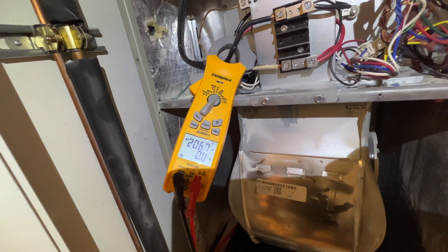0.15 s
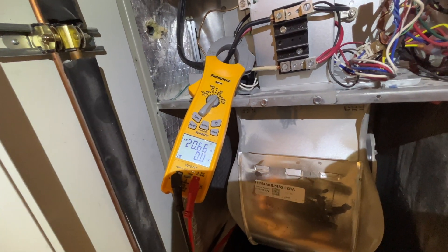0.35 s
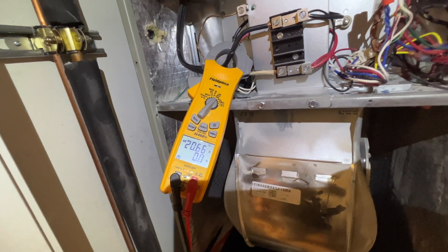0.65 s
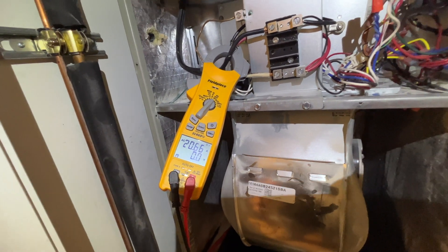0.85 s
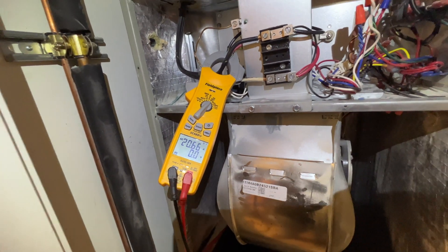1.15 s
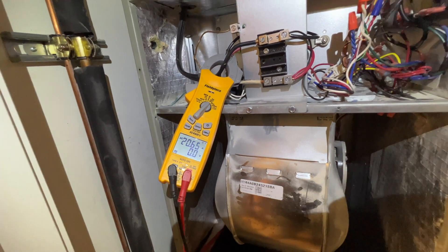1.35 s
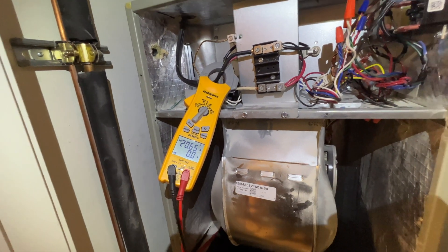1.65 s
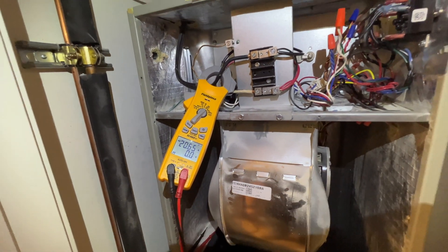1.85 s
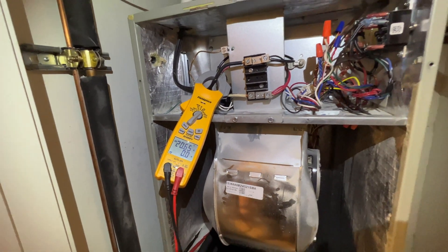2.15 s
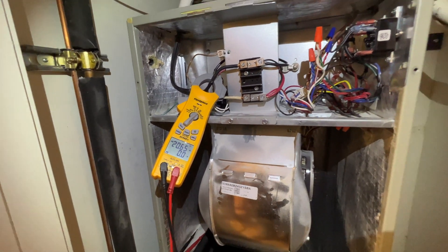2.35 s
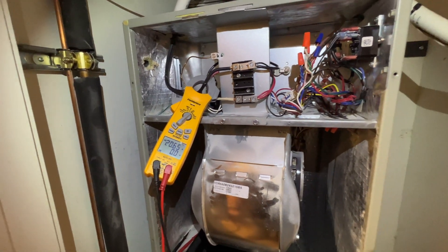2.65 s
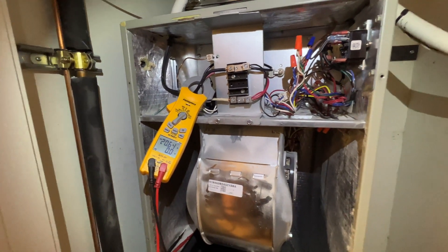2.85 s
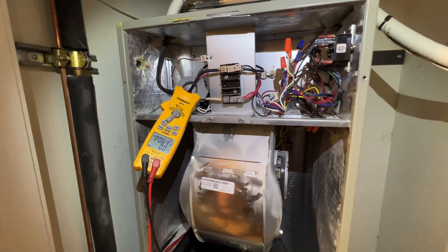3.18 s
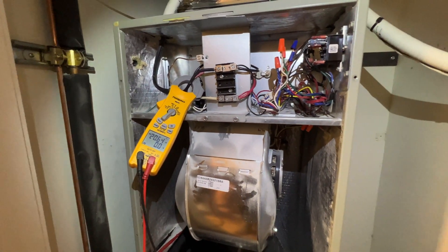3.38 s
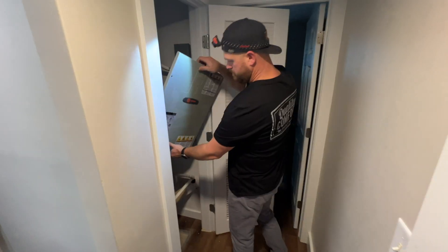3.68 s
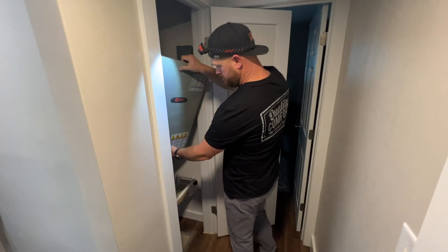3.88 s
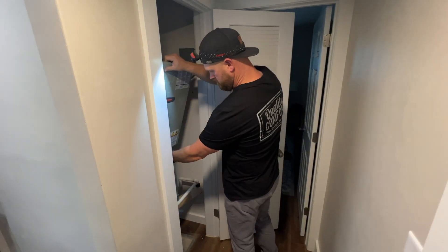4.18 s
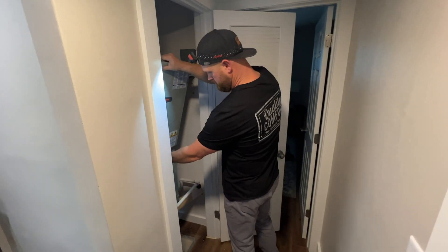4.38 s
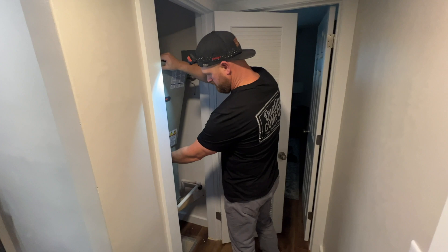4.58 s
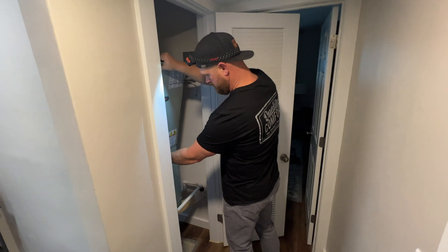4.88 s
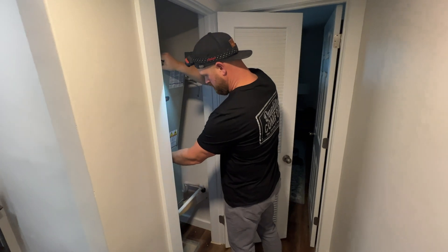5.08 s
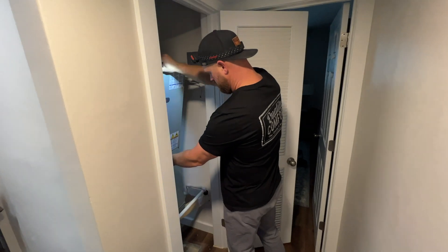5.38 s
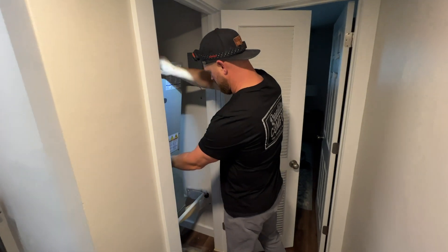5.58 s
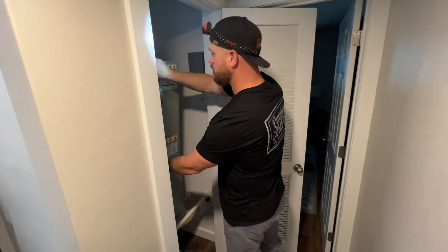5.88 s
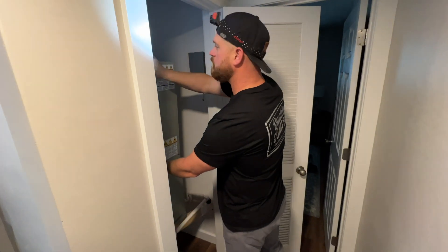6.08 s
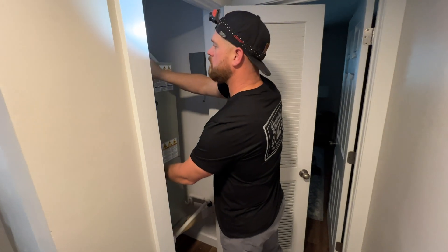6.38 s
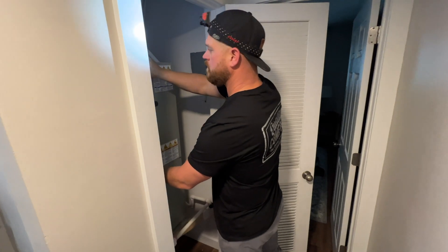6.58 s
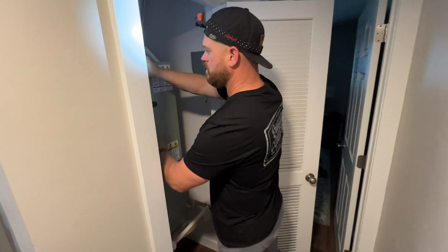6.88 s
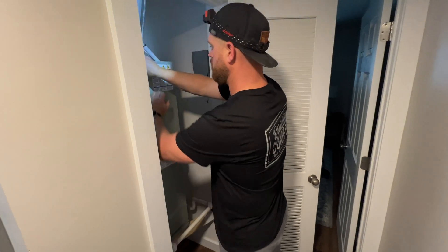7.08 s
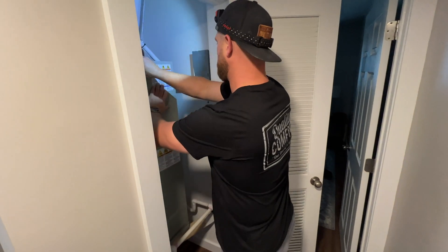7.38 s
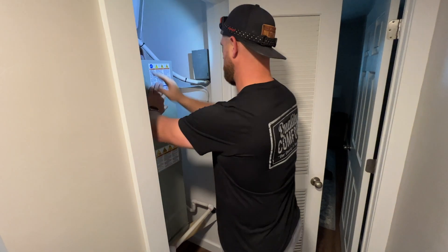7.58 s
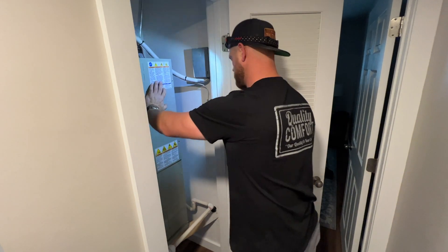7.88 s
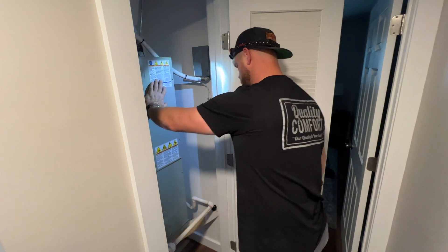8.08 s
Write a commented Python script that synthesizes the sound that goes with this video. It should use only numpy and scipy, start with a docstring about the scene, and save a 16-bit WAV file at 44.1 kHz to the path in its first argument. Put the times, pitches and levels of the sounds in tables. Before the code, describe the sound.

A blower rushes loudly through an open metal cabinet, then, abruptly quieter from a hallway, a sheet-metal panel bangs and scrapes shut over a low hum.

```python
"""At an air handler's open cabinet, close by, turbulent noise rushes through ringing sheet metal over a low rumble.
From 0.6 s the listener backs away, and the rush's echo off the closet wall colours it upward.
At 3.5 s the place jumps to the hallway: the access panel is knocked, slid and pushed into place, heard as
decaying modes, gritty noise and short cracks. Its closing muffles the rush and leaves the motor's hum and
faint whine, with thin whistles of air at the last slit; near the end the blower slowly grows."""
import sys
import numpy as np
from scipy import signal
from scipy.fft import rfft, irfft
from scipy.io import wavfile

SR = 44100
rng = np.random.default_rng(int(sys.argv[2]) if len(sys.argv) > 2 else 0)


def digitize_waveform(pressure):
    """Quantize a signal to 16-bit integers and store it at the path in sys.argv[1].

    Rows of a 2-D input are taken as channels; values are limited to [-1, 1].
    """
    field = np.atleast_2d(pressure).T
    bounded = np.clip(field, -1, 1)
    quanta = np.round(bounded * 32767).astype(np.int16)
    wavfile.write(sys.argv[1], SR, quanta)


N = 363825
TIME = np.arange(N) / SR   # s
FREQS = np.maximum(np.fft.rfftfreq(N, 1 / SR), 1)   # Hz
LEFT_RIGHT = np.array([[1], [-1]])
MOVE_S = 3.494   # the listening point jumps from the cabinet to the hallway

# the sound field in the hallway: (frequency [Hz], left-right likeness [-1 to 1], left minus right [dB])
HALLWAY_FIELD = [(60, 1, 1), (120, 1, 3), (202, 0.68, -3), (380, 0.87, -1), (466, 0, 1.5), (670, 0.13, 5),
                 (1300, 0.057, 2), (2380, 0.065, 1), (4660, 0, 7), (8300, 0, 10), (11700, 0.36, 0)]


def from_db(db):
    """Decibels to gain."""
    return 10 ** (np.asarray(db) / 20)


def rms(x):
    """Root mean square."""
    return np.sqrt(np.mean(x ** 2) + 1e-20)


def in_time(rows):
    """Each column of a curve at every sample."""
    s, *columns = np.transpose(rows)
    return [np.interp(TIME, s, c) for c in columns]


def in_frequency(rows):
    """Each column of a spectrum at every frequency."""
    hz, *columns = np.transpose(rows)
    return [np.interp(np.log(FREQS), np.log(hz), c) for c in columns]


def ease(start, length):
    """A smooth move from 0 to 1."""
    return (1 - np.cos(np.pi * np.clip((TIME - start) / length, 0, 1))) / 2


def drift(rate_hz):
    """Random wander of rms 1, weak above the given rate."""
    slow = irfft(rfft(rng.standard_normal(N)) / (1 + (FREQS / rate_hz) ** 2), N)
    return slow / rms(slow)


def dying(t, t60):
    """A decay by 60 dB in t60 seconds that starts at t = 0."""
    return from_db(-60 * np.clip(t / t60, 0, 4)) * (t >= 0)


def low_pass(x, hz):
    """Three-pole low-pass."""
    return signal.sosfilt(signal.butter(3, min(hz, .45 * SR), fs=SR, output="sos"), x)


def add(out, s, sound):
    """Mix a stereo sound in at a given time."""
    at = int(s * SR)
    out[:, at:at + sound.shape[1]] += sound[:, :N - at]


def standing_waves():
    """Early echoes ripple the spectrum (dB), differently at each ear and most in the middle range."""
    depth_db, echo_spread_s, fade_above_hz = 6, 0.0098, 2270
    # smoothing along frequency sets how closely the ripples are spaced
    r = np.exp(-2 * np.pi * echo_spread_s * SR / N)
    ripple = signal.lfilter([1], [1, -2 * r, r * r], rng.standard_normal((2, len(FREQS))))
    return depth_db * ripple / rms(ripple) / (1 + 600 / FREQS + FREQS / fade_above_hz)


def air(spectrum, stereo, lift_db=0):
    """Stereo noise of rms 1 with a given colour; a table sets how alike the two ears are at each pitch."""
    alike, balance_db = in_frequency(stereo)
    alike = np.clip(alike, -1, 1)
    mid, side = rfft(rng.standard_normal((2, N)))
    pair = np.sqrt(1 + alike) * mid + np.sqrt(1 - alike) * side * LEFT_RIGHT
    colour_db = in_frequency(spectrum)[0] + lift_db + LEFT_RIGHT * balance_db / 2
    noise = irfft(pair * from_db(colour_db + standing_waves()) * (FREQS > 15), N)
    return noise / rms(noise)


def open_blower(flutter_db=.5):
    """Turbulence from the wheel rings in the cabinet; stepping back changes which resonances stand out."""
    # air at the open cabinet: (frequency [Hz], relative level per Hz [dB])
    rush_colour = [(25, -35), (40, -12), (62, -4.5), (110, -1), (165, -9), (260, -15), (420, -10.5),
                   (600, -19), (740, -17.5), (1000, -18.5), (2000, -21.5), (3300, -27), (7000, -32.5),
                   (9000, -34.5), (10500, -47.5), (15000, -52)]
    # cabinet resonances: (frequency [Hz], width [Hz], lift close by [dB], lift a step back [dB])
    cabinet_modes = [(113, 76, 1.5, 0), (180, 26, 0.5, -1.5), (210.6, 31.6, 9, 10), (319, 47, 7.5, 2.5),
                     (475, 58, 1, 7), (646, 103, 5, -0.5), (824, 87, 5.5, 2.5), (866, 35, 4, 5),
                     (1030, 96, 0.5, 2.5), (1230, 140, 0.5, 1), (1607, 21, 7.5, 2), (1730, 21, -13, 5)]
    # the sound field at the cabinet: (frequency [Hz], left-right likeness [-1 to 1], left minus right [dB])
    near_field = [(60, 0.99, -0.5), (199, 0.98, 2.5), (382, 0.89, 3.5), (610, 0.43, -1), (800, 0.97, 3.5),
                  (1300, 0.26, 3), (2360, 0, -1.5), (3520, 0, 0), (4730, 0.22, 6), (7600, 0, 0)]
    back_start_s, back_takes_s = 0.61, 1.84
    close_level_db, back_loss_db = -29, 1.21

    back = ease(back_start_s, back_takes_s)
    hz, width, close_db, back_db = np.transpose(cabinet_modes)
    bells = 1 / (1 + (2 * (FREQS[:, None] - hz) / width) ** 2)
    # equal-power crossfade between the two distances
    rush = np.sqrt(1 - back) * air(rush_colour, near_field, bells @ close_db)
    rush += np.sqrt(back) * air(rush_colour, near_field, bells @ back_db)
    return rush * from_db(close_level_db - back_loss_db * back + flutter_db * drift(21))


def wall_echo(rush):
    """The closet wall returns the rush a moment later; the lag shrinks with distance, so the colour sweeps upward."""
    # lag of the echo off the closet wall: (time [s], left [ms], right [ms])
    wall_lag = [(0, 1.42, 1.15), (0.8, 1.38, 1.15), (1.7, 1.17, 0.9), (2.8, 0.98, 0.8), (3.5, 0.85, 0.75)]
    echo_db, echo_top_hz = -11.5, 4370
    dull = signal.sosfilt(signal.butter(1, echo_top_hz, fs=SR, output="sos"), rush)
    echo = [np.interp(TIME - lag_ms / 1000, TIME, ear) for lag_ms, ear in zip(in_time(wall_lag), dull)]
    return rush + from_db(echo_db) * np.array(echo)


def hallway_blower(waver_db=-1.5, hum_wander=0.91):
    """The escaping air fades as the gap narrows; hum and rumble step up when the panel seats; all grow on approach."""
    # rumble and air that reach the hallway through the cabinet walls: (frequency [Hz], relative level per Hz [dB])
    through_walls = [(25, -38), (45, -6.5), (70, 3), (125, 3.5), (170, -21), (205, -13), (255, -22.5),
                     (360, -16.5), (450, -36), (510, -25.5), (580, -27.5), (740, -25.5), (850, -27.5),
                     (940, -30), (4000, -45), (9500, -45.5), (15000, -53)]
    # air that escapes past the panel: (frequency [Hz], relative level per Hz [dB])
    past_panel = [(100, 10), (300, 5.5), (500, 4.5), (620, -4), (730, -5.5), (820, 4), (920, -5),
                  (1050, -2.5), (1400, -7), (2000, -5), (3500, -14.5), (8500, -23), (11000, -45),
                  (15000, -46)]
    # the gap beside the panel narrows steadily until it is as good as shut
    shut_s, leak_db, leak_fall_db_per_s = 6.54, -41.5, 3.5
    # the panel seats on its frame and from then on radiates the motor's hum and rumble
    seat_s, seat_takes_s = 4.6, 0.66
    hum_hz, hum_db, seated_hum_db = 117.8, -49, 9   # level before seating, gain once seated
    rumble_db, seated_rumble_db = -36, 1.03
    # the listener then edges toward the closet; the hum grows faster than the air
    approach_start_s, air_db_per_s, hum_db_per_s = 6.8, 1.4, 3.2

    closing_s = np.clip(TIME, MOVE_S, shut_s) - MOVE_S
    seated = ease(seat_s, seat_takes_s)
    approach_s = np.maximum(TIME - approach_start_s, 0)
    leak = from_db(leak_db - leak_fall_db_per_s * closing_s) * air(past_panel, HALLWAY_FIELD)
    rumble = from_db(rumble_db + seated_rumble_db * seated) * air(through_walls, HALLWAY_FIELD)
    hum = np.sqrt(2) * np.sin(2 * np.pi * hum_hz * TIME + hum_wander * drift(6.6))
    hum_level_db = hum_db + seated_hum_db * seated + hum_db_per_s * approach_s
    hum *= from_db(hum_level_db + waver_db * drift(3.3))
    return from_db(air_db_per_s * approach_s) * (leak + rumble) + hum


def motor_whine():
    """Thin tones of the motor come and go, creeping upward in pitch, a little stronger on the left."""
    # whine tones: (start [s], end [s], first pitch [Hz], last pitch [Hz], level before left-right lean [dB])
    whine_tones = [(4.6, 6.0, 808, 818, -65), (6.45, 7.85, 665, 682, -62), (7.25, 8.5, 871, 877, -60.5)]
    fade_s, lean_db, wander_rad = .2, 2.0, .3
    out = 0
    for start, end, first_hz, last_hz, db in whine_tones:
        pitch = np.interp(TIME, [start, end], [first_hz, last_hz])
        phase = 2 * np.pi * np.cumsum(pitch) / SR
        gate = np.clip(np.minimum(TIME - start, end - TIME) / fade_s, 0, 1)
        out = out + np.sqrt(2) * gate * from_db(db) * np.sin(phase + wander_rad * drift(1.4))
    return out * from_db(lean_db * LEFT_RIGHT)


def slit_whistles():
    """Air whistles thinly and unsteadily through the last slit; each pitch rises and falls with its loudness."""
    # whistles: (start [s], length [s], base pitch [Hz], rise [Hz], level at full swell before flicker [dB])
    whistle_tones = [(5.75, 1.7, 7050, 100, -76), (5.65, 1.8, 8050, 70, -74), (6.9, 0.22, 9700, 500, -72),
                     (7.16, 0.2, 9700, 350, -71)]
    wander, blur, flicker_db = .005, .007, 3   # slow and fast pitch spread as fractions
    out = 0
    for start, length, hz, rise_hz, db in whistle_tones:
        swell = np.sin(np.pi * np.clip((TIME - start) / length, 0, 1))
        pitch = (hz + rise_hz * swell ** 2) * (1 + wander * drift(9) + blur * drift(250))
        level = from_db(db + flicker_db * drift(8.8)) * np.sqrt(np.abs(swell))
        out = out + np.sqrt(2) * level * np.sin(2 * np.pi * np.cumsum(pitch) / SR)
    return out


def panel_scrapes(grit_db=2.5, room_t60=0.19):
    """Short gritty slides of metal on metal: each swells as the edge bites, then dies away in the hallway."""
    # the panel's edge slides on the frame: (time [s], level before low-pass [dB], length [s], cut-off [Hz])
    edge_slides = [(3.704, -52, 0.044, 9000), (3.858, -41.5, 0.031, 14000), (4.058, -43.5, 0.0079, 14000),
                   (4.533, -51, .022, 6000), (4.852, -46, 0.054, 8000), (4.896, -40.5, 0.025, 14000),
                   (5.173, -54.5, 0.033, 14000), (5.427, -51, 0.041, 4000), (5.858, -45.5, 0.022, 2400),
                   (6.584, -47.5, 0.017, 9000), (6.702, -48, 0.01, 2400), (6.81, -53, 0.0093, 3500),
                   (7.425, -48, 0.022, 12000), (7.473, -49, .02, 2400), (8.16, -55, .06, 14000)]
    # colour of the sliding edge: (frequency [Hz], relative level per Hz [dB])
    edge_colour = [(100, -14), (330, 8), (800, 10), (1500, 14), (3000, 8), (4300, 5.5), (5700, 4.5),
                   (9000, 0), (11000, -11), (15000, -5)]
    friction = from_db(grit_db * drift(230)) * air(edge_colour, HALLWAY_FIELD)
    out = 0
    for s, db, length, top_hz in edge_slides:
        swell = np.clip((TIME - s) / (length / 3), 0, 1)
        stroke = swell * dying(np.maximum(TIME - s - length, 0), room_t60)
        out = out + from_db(db) * stroke * low_pass(friction, top_hz)
    return out


def lip_snaps(crack_t60=0.013, room_db=-11, room_t60=0.27):
    """The panel's lip snaps on the metal frame: a crisp crack of narrow noise with a short hallway echo."""
    # snaps: (time [s], level before left-right lean and decay [dB], pitch [Hz])
    snaps = [(4.058, -39, 1850), (4.485, -45, 2600), (4.899, -37, 6200), (4.907, -39, 6100),
             (4.913, -42, 7200), (4.921, -41, 5950), (4.934, -47, 5800), (4.962, -50, 6100),
             (5.453, -50, 4530), (6.596, -50, 3600), (6.708, -48, 1790), (7.288, -54, 4800),
             (7.423, -44, 3140), (7.427, -52, 8000)]
    spread = 1.25   # a snap's band reaches this factor either side of its pitch
    out, t = np.zeros((2, N)), TIME[:SR // 2]
    fade = dying(t, crack_t60) + from_db(room_db) * dying(t, room_t60)
    balance_db = in_frequency(HALLWAY_FIELD)[1]
    for s, db, hz in snaps:
        edges_hz = [hz / spread, min(hz * spread, .45 * SR)]
        band = signal.butter(2, edges_hz, "band", fs=SR, output="sos")
        crack = signal.sosfilt(band, rng.standard_normal((2, len(t))))
        lean_db = balance_db[np.searchsorted(FREQS, hz)] * LEFT_RIGHT / 2
        add(out, s, from_db(db + lean_db) * fade * crack / rms(crack))
    return out


def panel_modes(swell_cycles=0.96):
    """One second of the panel's ring; low modes swell last, high ones reach the two ears out of step."""
    # panel modes: (frequency [Hz], relative level [dB], decay t60 [s])
    sheet_modes = [(77, 1, 0.21), (105.7, -5, 0.31), (125, -5.5, 0.45), (140.6, -6, 0.29),
                   (183.6, -8.5, 0.42), (186, -21, 0.26), (261, -17.5, 0.2), (297, -13.5, 0.31),
                   (330, -4.5, 0.32), (380, -12, 0.47), (450, -24, 0.14), (575, -13, 0.14),
                   (617, -14, 0.25), (715, -22, 0.07), (802, -18, .1), (870, -12, 0.14), (972, -13, 0.07),
                   (1074, -19, 0.13), (1180, -21, 0.15), (1500, -22.5, 0.19), (1704, -16, 0.086),
                   (1900, -18.5, 0.15)]
    out, t = 0, TIME[:SR]
    alike, hall_db = in_frequency(HALLWAY_FIELD)
    for k, (hz, db, t60) in enumerate(sheet_modes):
        here, sign = np.searchsorted(FREQS, hz), (-1) ** k
        apart = np.arccos(np.clip(alike[here], -1, 1)) / 2   # phase that gives this likeness
        wave = sign * np.sin(2 * np.pi * hz * t + LEFT_RIGHT * apart)
        swell = 1 - np.exp(-t * hz / swell_cycles)
        out = out + from_db(db + LEFT_RIGHT * hall_db[here] / 2) * wave * dying(t, t60) * swell
    return out


def bend(ring, lag_s):
    """Low bending waves cross the sheet slowly, so a knock sweeps down from a tick into a thud."""
    late_below_hz = 564
    hz = np.fft.rfftfreq(2 * SR, 1 / SR)
    delay_s = lag_s / (1 + (hz / late_below_hz) ** 4)
    # summing the delay over frequency gives the phase
    turn = np.exp(-2j * np.pi * np.cumsum(delay_s) * hz[1])
    return irfft(rfft(ring, 2 * SR) * turn)[:, :SR]


def knock(hz):
    """A few cycles from the struck spot, which reach the listener before the panel's late low notes."""
    peak_cycles = 1.52   # cycles until the knock is at its height
    cycles = hz * TIME[:SR]
    age = cycles / peak_cycles
    return np.sin(2 * np.pi * cycles) * age ** 2 * np.exp(2 - 2 * np.minimum(age, 20))


def panel_blows(clank_db=-7.5, clank_t60=0.31, tail_db=-24, tail_t60=1.0):
    """Each strike knocks and rings the panel; the soft push behind it reaches only the lowest modes."""
    # a hard strike and the soft push of the hand, levels before filtering: (time [s], strike [dB],
    # strike cut-off [Hz], push [dB], push cut-off [Hz], lag of the low notes [s], knock [dB], knock pitch [Hz])
    blows = [(4.058, -19.5, 2390, -13, 228, .005, -26, 990),
             (4.483, -15.5, 1500, -17.5, 316, 0.0018, -30, 940),
             (4.533, -29.5, 2186, -27, 423, 0.0018, -33, 397),
             (4.899, -27, 1410, -5, 80, 0.01096, -33, 1060), (4.914, -31, 1000, -34, 350, 0.0019, -29, 322),
             (5.236, -36, 2400, -22.5, 136, 0.0012, -29.5, 350),
             (5.261, -37, 1800, -36, 140, .001, -43, 403), (5.453, -39, 2500, -23, 126, .001, -42, 1690),
             (5.881, -38, 1600, -42, 170, .001, -47, 1410), (6.704, -48, 3000, -49, 150, .001, -45, 1600),
             (7.42, -39, 4000, -26.5, 109, 0.00086, -33, 350)]
    # the panel's crowd of weaker modes: (frequency [Hz], relative level per Hz [dB])
    crowd_colour = [(60, -14), (130, 15.5), (250, 12.5), (500, 7.5), (1000, -1), (1400, -4), (2000, -12),
                    (3000, -7.5), (8000, -29), (15000, -11.5)]
    strike_low_hz = 385   # a strike is too brief to move the panel's lowest modes
    out, t = np.zeros((2, N)), TIME[:SR]
    modes, crowd = panel_modes(), air(crowd_colour, HALLWAY_FIELD)
    # the crowd of weaker modes dies quickly and the hallway holds a faint tail
    fade = from_db(clank_db) * dying(t, clank_t60) + from_db(tail_db) * dying(t, tail_t60)
    brief = signal.butter(2, strike_low_hz, "high", fs=SR, output="sos")
    for s, strike_db, strike_hz, push_db, push_hz, lag_s, knock_db, knock_hz in blows:
        pick = rng.integers(0, N - SR)   # a fresh stretch of noise for each blow
        ring = bend(modes + fade * crowd[:, pick:pick + SR], lag_s)
        strike = from_db(strike_db) * signal.sosfilt(brief, low_pass(ring, strike_hz))
        push = from_db(push_db) * low_pass(ring, push_hz)
        add(out, s, strike + push + from_db(knock_db) * knock(knock_hz))
    return out


def scene():
    """First at the open cabinet, then in the hallway."""
    moved = np.clip((TIME - MOVE_S) / 0.001, 0, 1)
    blower = hallway_blower() + motor_whine() + slit_whistles()
    panel = panel_scrapes() + lip_snaps() + panel_blows()
    return (1 - moved) * wall_echo(open_blower()) + moved * (blower + panel)


def record(dry):
    """The microphone has narrow dips in the treble, its right port hears the bass a little late, and the top is cut."""
    # dips in the microphone's response: (frequency [Hz], width [Hz], depth [dB])
    mic_dips = [(5350, 190, -11), (7580, 440, -10), (10940, 1090, -21.5)]
    port_lag_s, port_lag_top_hz, cutoff_hz = 0.00011, 550, 15700
    dips_db = sum(db / (1 + (2 * (FREQS - hz) / width) ** 8) for hz, width, db in mic_dips)
    lag_s = port_lag_s / (1 + (FREQS / port_lag_top_hz) ** 6) * np.array([[0], [1]])
    late = np.exp(-2j * np.pi * FREQS * lag_s)
    top = 1 / (1 + (FREQS / cutoff_hz) ** 120)
    return irfft(rfft(dry) * from_db(dips_db) * late * top, N)


dry = scene()
out = record(dry)
digitize_waveform(out)
```